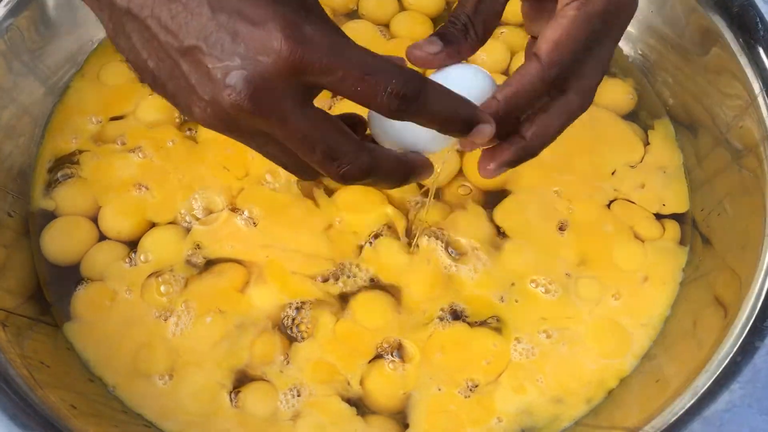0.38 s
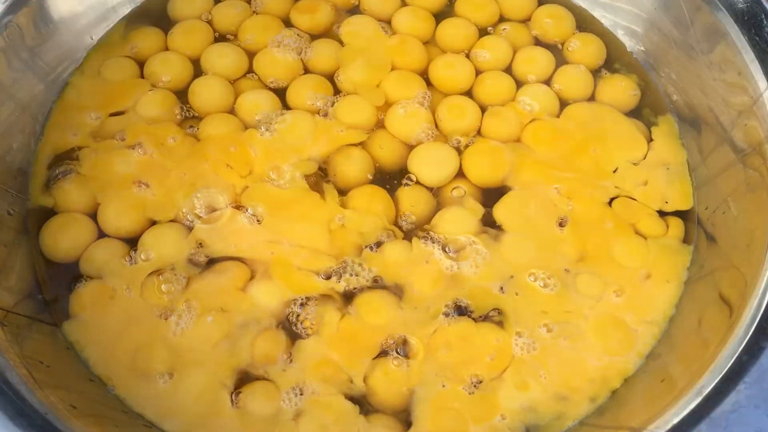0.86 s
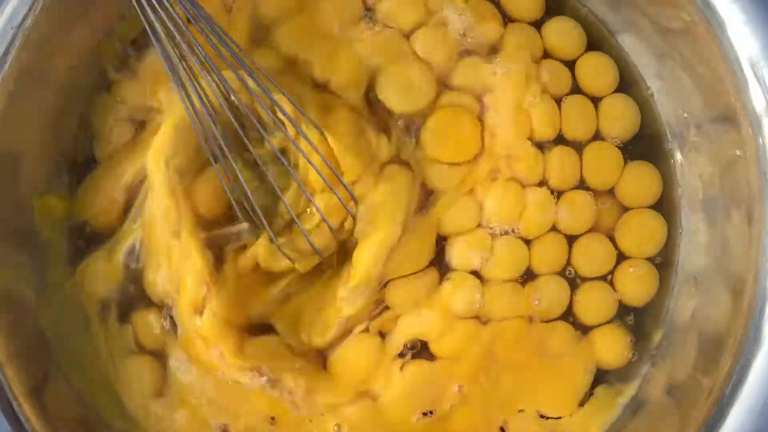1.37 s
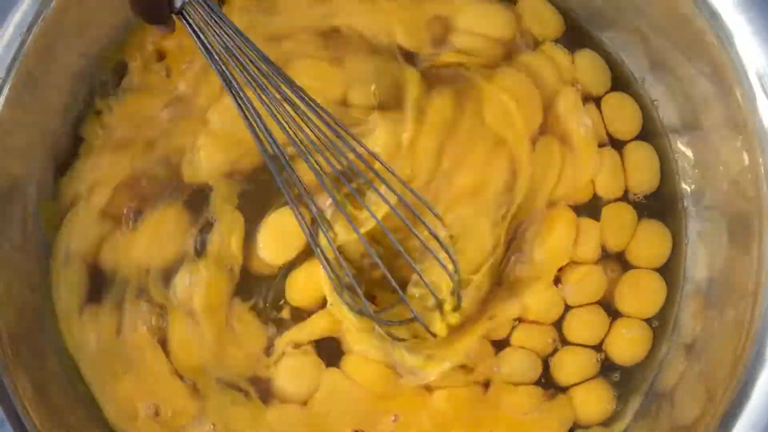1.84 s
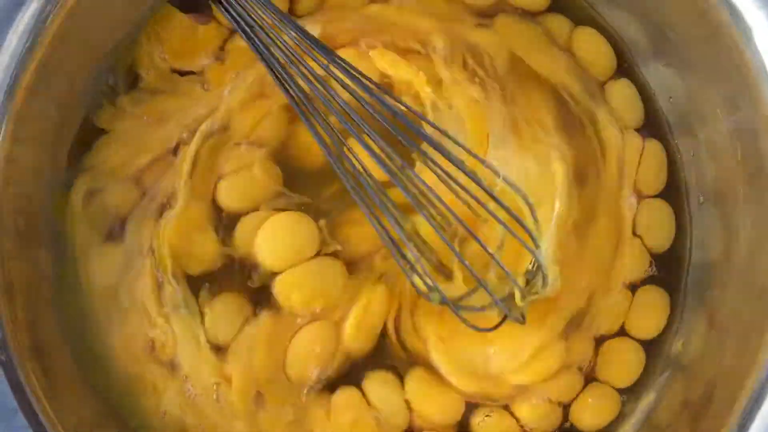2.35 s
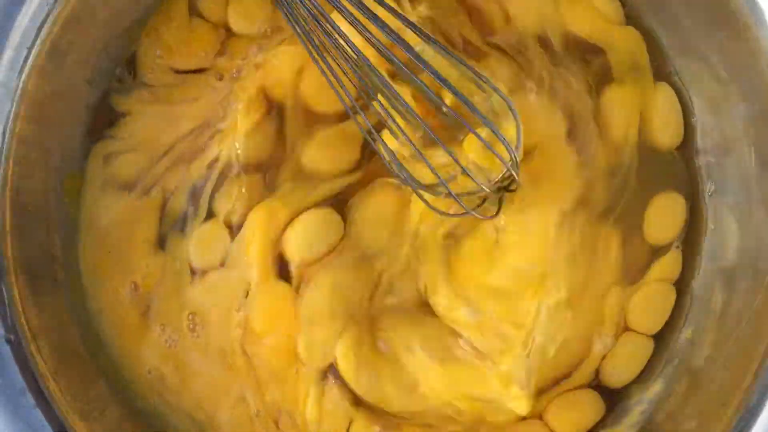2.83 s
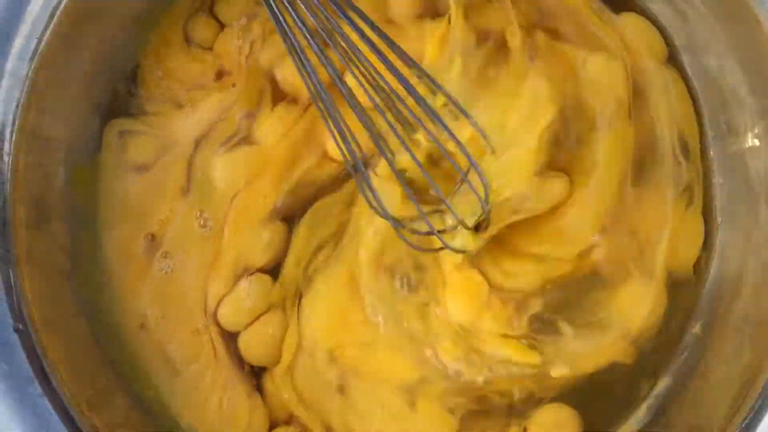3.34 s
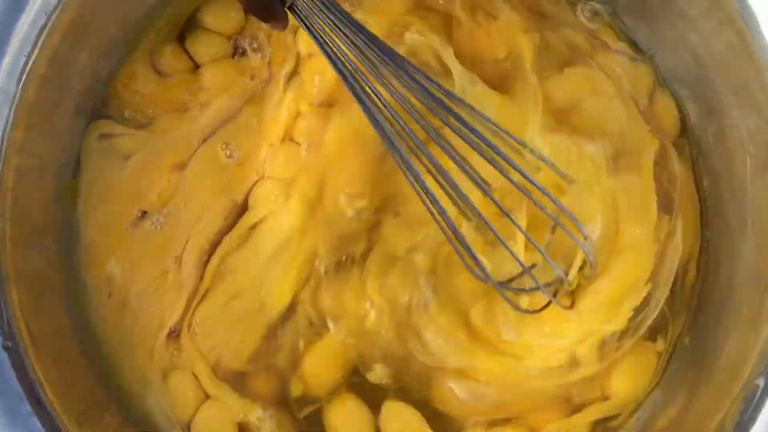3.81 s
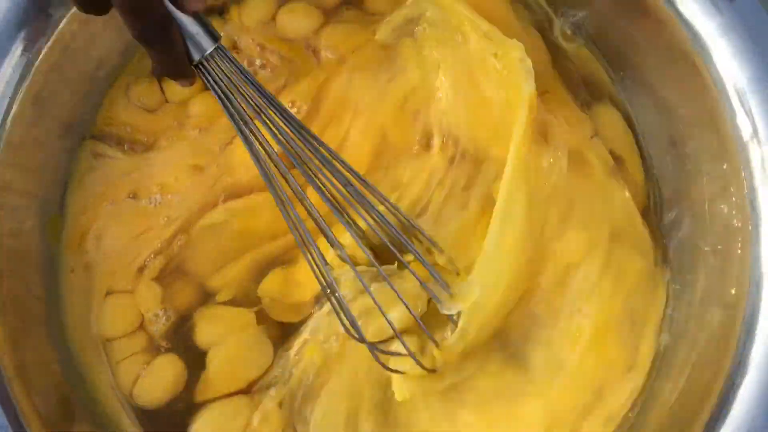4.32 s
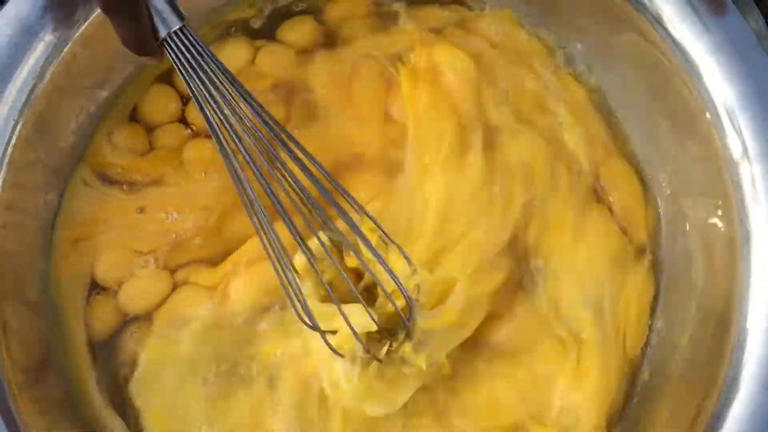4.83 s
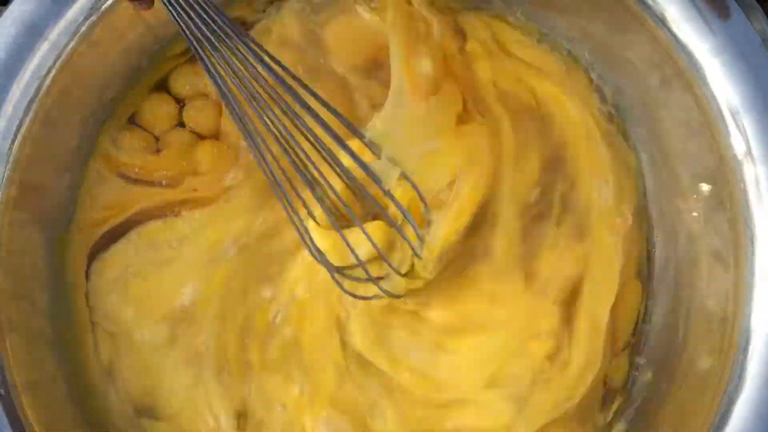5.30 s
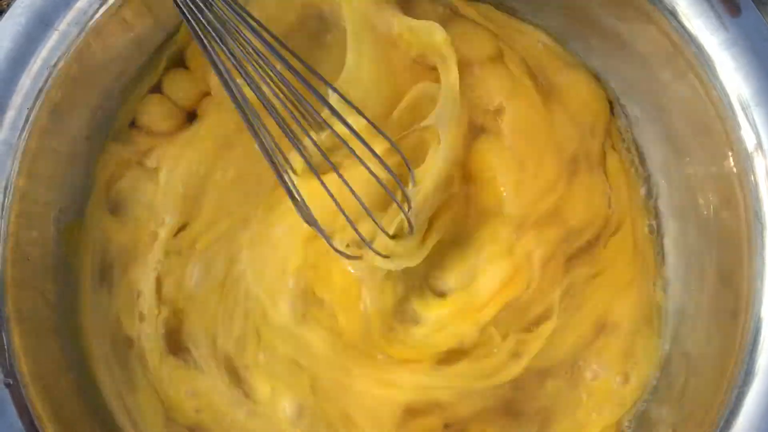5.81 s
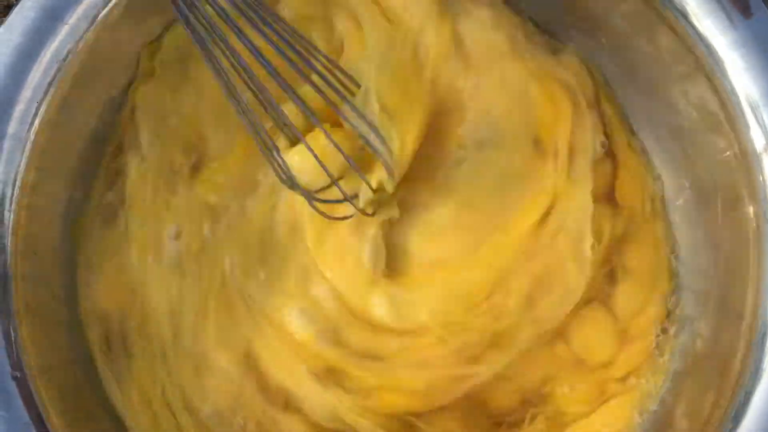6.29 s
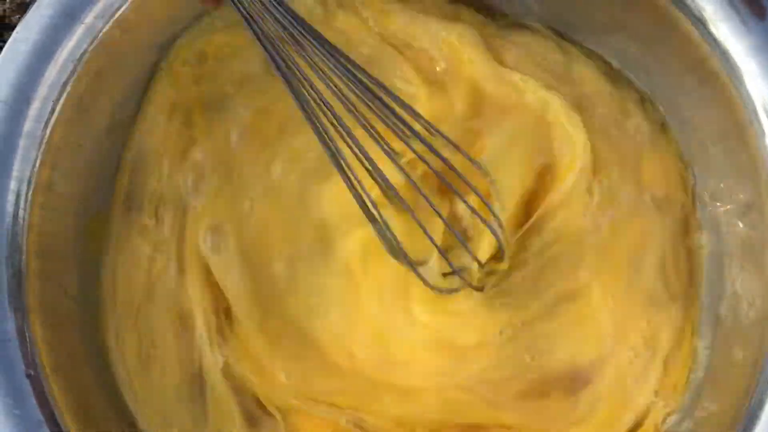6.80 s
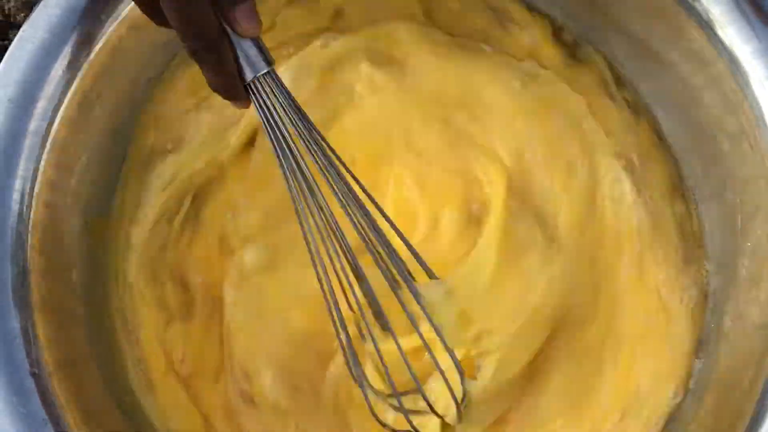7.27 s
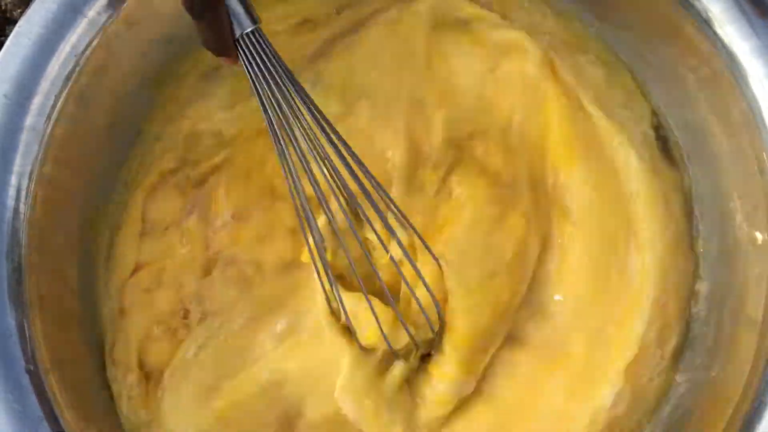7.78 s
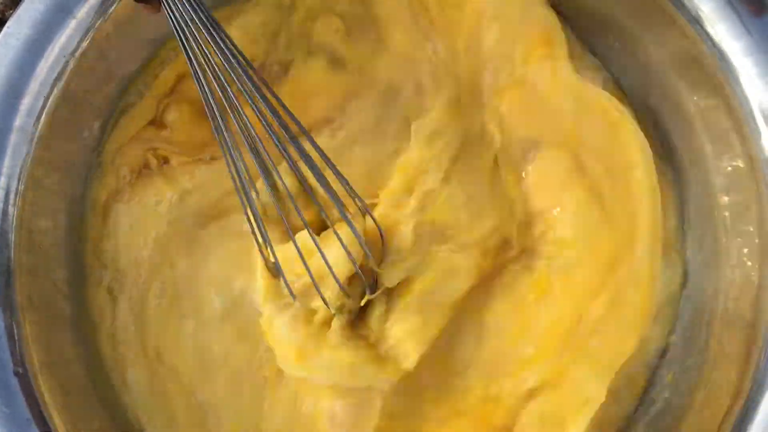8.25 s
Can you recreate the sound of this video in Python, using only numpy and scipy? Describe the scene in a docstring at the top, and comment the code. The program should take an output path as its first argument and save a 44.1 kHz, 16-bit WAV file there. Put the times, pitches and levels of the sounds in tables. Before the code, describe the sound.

A nearly quiet opening with small crisp eggshell ticks over light wind, then a sudden wet plop as the whisk enters. Hesitant first strokes grow into vigorous, steady beating: thick sloshes, rising bubble pops, fine splashes and short rattling wire hits on a heavy muffled steel bowl. The microphone is close, in open air with little echo, catching low gusts or bumps and a faint upward bird whistle.

```python
"""Whisking eggs outdoors

An egg shell is pulled apart over a large steel bowl of raw eggs; a wire whisk plunges in and, after a
short gap of silence, beats them about four times a second. Shell cracks and bubbles pop and gurgle as damped
sines of climbing pitch, wet films snap as ragged noise ticks, and wires strike the modes of the egg-damped
bowl. Low shaped noise makes wind and perhaps table bumps; a distant bird whistles upward as a gliding sine."""
import sys
import numpy as np
from scipy import signal
from scipy.fft import rfft, irfft, next_fast_len
from scipy.io import wavfile
from scipy.ndimage import uniform_filter1d, map_coordinates

SR = 44100
rng = np.random.default_rng(int(sys.argv[2]) if len(sys.argv) > 2 else 0)


def convert_level_to_amplitude(level_db):
    """Map a level in decibels to its linear amplitude factor."""
    exponent = np.asarray(level_db, float) / 20
    return 10 ** exponent


def digitize_waveform(pressure):
    """Quantize a signal to 16-bit integers and store it at the path in sys.argv[1].

    Rows of a 2-D input are taken as channels; values are limited to [-1, 1].
    """
    field = np.atleast_2d(pressure).T
    bounded = np.clip(field, -1, 1)
    quanta = np.round(bounded * 32767).astype(np.int16)
    wavfile.write(sys.argv[1], SR, quanta)


N = 381024  # samples: 8.64 s


def unit(x):
    """Scales x to rms 1."""
    return x / np.sqrt(np.mean(x ** 2) + 1e-20)


def rows_unit(x):
    """Scales every row to energy 1."""
    return x / np.linalg.norm(x, axis=1, keepdims=True)


def noise():
    """White noise for the whole scene."""
    return rng.standard_normal(N)


def along(points, hz):
    """Reads a curve of (f/Hz, value) points on a log frequency axis."""
    f, value = np.transpose(points)
    return np.interp(np.log(hz + 1), np.log(f + 1), value)


def curve(rows):
    """One value per sample, in straight lines between (t/s, value) rows."""
    return np.interp(np.arange(N) / SR, *np.transpose(rows))


def wobble(rate):
    """A smooth random curve with `rate` knots a second."""
    knots = rng.standard_normal(int(N * rate / SR) + 4)
    return map_coordinates(knots, [np.arange(N) * rate / SR])


def filtered(x, response):
    """x times a response of frequency."""
    m = next_fast_len(N + SR // 2)
    return irfft(rfft(x, m) * response(np.fft.rfftfreq(m, 1 / SR)), m)[..., :N]


def coloured(x, spectrum):
    """x through an EQ curve of (f/Hz, level/dB) points."""
    return filtered(x, lambda hz: convert_level_to_amplitude(along(spectrum, hz)))


def placed(times, grains):
    """Mixes rows of samples at their start times in seconds."""
    at = np.round(times * SR).astype(int)[:, None] + np.arange(grains.shape[1])
    return np.bincount(at.ravel(), grains.ravel(), N + SR)[:N]


def swells(s, db, rise_db_per_s, fall_db_per_s):
    """Summed power of humps that climb to a peak and die away, straight in dB."""
    step = np.arange(0, N, 64) / SR
    lag = step - s[:, None]
    hump_db = db[:, None] - np.where(lag < 0, -lag * rise_db_per_s, lag * fall_db_per_s)
    power = (convert_level_to_amplitude(hump_db) ** 2).sum(axis=0)
    return np.interp(np.arange(N) / SR, step, power)


def bubbles(s, db, hz, t60, rise, attack, rough, linger, size):
    """Damped sines whose pitch climbs, as when a pocket nears the surface, and wavers like its moving walls."""
    t = np.arange(size) / SR
    hz, t60 = hz[:, None], t60[:, None]
    walk = np.cumsum(rng.standard_normal((len(s), size)), axis=1)
    waver = uniform_filter1d(walk, size=24, axis=1) * np.sqrt(hz / SR)
    # rise: share of the pitch gained in one t60
    turns = hz * (t + rise * t * t / (2 * t60)) + rough * waver
    fade = (1 - linger) * convert_level_to_amplitude(-60 * t / t60) + linger * convert_level_to_amplitude(-24 * t / t60)  # a weak part sings on
    onset = 1 - np.exp(-t * hz / attack)  # attack in cycles
    shape = convert_level_to_amplitude(db[:, None]) * fade * onset * (1 - t / t[-1])
    return placed(s, shape * np.sin(2 * np.pi * turns))


# Slow wind: t/s, buffet level/dB before a small random wobble
BREEZE_LEVEL = [(0, -54.5), (.6, -61.5), (.8, -57), (1.5, -59.5), (1.9, -55.5), (2.3, -70), (2.42, -76),
                (2.6, -61), (3.4, -59.5), (3.9, -66), (4.7, -59), (5.2, -52.5), (5.55, -56), (5.75, -63),
                (6.3, -60.5), (6.7, -56.5), (7.1, -63), (8.63, -59.5)]
# Low swells: wind gusts, perhaps some table bumps: t/s, peak level/dB, time to fall 10 dB on each side/s
LOW_SWELLS = [(1.31, -48.5, .1), (2.199, -36.5, 0.12), (3.56, -50.5, 0.1), (3.78, -51.5, 0.07),
              (4.0, -39, 0.03), (4.25, -49.5, 0.1), (4.41, -42.5, 0.06), (4.81, -38, 0.05),
              (4.92, -32.5, 0.0628), (5.82, -45, .08), (6.89, -42.5, 0.04), (8.29, -45.5, 0.1),
              (8.49, -41, 0.02), (8.63, -44.5, .04)]
# Colour of the low rumble: f/Hz, relative level/dB per Hz
BUFFET_COLOUR = [(12, -50), (20, -20.5), (49, 9.5), (83, 2.5), (175, -18), (400, -41), (520, -64),
                 (880, -120)]
# Colour of the flapping in strong swells: f/Hz, relative level/dB per Hz
FLAP_COLOUR = [(40, -120), (70, -31), (110, 4.5), (200, -10.5), (400, -34), (800, -120)]
# Colour of the outdoor hush: f/Hz, relative level/dB per Hz
HUSH_COLOUR = [(100, -8.5), (160, -5), (300, -12.5), (600, -19), (1200, -21), (3000, -30.5), (8000, -38),
               (16000, -42.5)]


def outdoors():
    """Lumpy low noise of wind on the microphone and perhaps table bumps, higher as it swells, over a hush."""
    s, db, width = np.transpose(LOW_SWELLS)
    slope = 10 / width[:, None]  # dB per s
    breeze = convert_level_to_amplitude(curve(BREEZE_LEVEL) + 1.5 * wobble(7.7)) ** 2
    force_db = 10 * np.log10(swells(s, db, slope, slope) + breeze)
    buffet = unit(coloured(noise(), BUFFET_COLOUR) * convert_level_to_amplitude(0.9 * wobble(9.8)))
    flap = unit(coloured(noise(), FLAP_COLOUR) * convert_level_to_amplitude(5 * wobble(20)))
    hush = unit(coloured(noise(), HUSH_COLOUR)) * convert_level_to_amplitude(0.98 * wobble(3.7))
    flap_db = 1.413 * force_db + 5.5  # grows faster than the buffet
    return convert_level_to_amplitude(force_db) * buffet + convert_level_to_amplitude(flap_db) * flap + convert_level_to_amplitude(-66) * hush


# Bird whistles: t/s, level/dB before a quick random wobble
WHISTLES = [(2.798, -74), (2.988, -68), (3.188, -66), (3.388, -66)]


def bird():
    """A repeated whistle: a slightly unsteady sine that rises, more slowly towards its top."""
    t = np.arange(int(.085 * SR)) / SR
    hz = 2300 + 2700 * (1 - np.exp(-t / 0.11))
    swell = np.sin(np.pi * t / t[-1]) ** 0.51
    call = swell * np.sin(2 * np.pi * np.cumsum(hz) / SR)
    s, db = np.transpose(WHISTLES)
    return placed(s, convert_level_to_amplitude(db[:, None]) * call) * convert_level_to_amplitude(1.7 * wobble(90))


def hollow(x, size=4096):
    """The bowl's open hollow answers with a short dull tail that varies at random from moment to moment."""
    t = np.arange(size) / SR
    starts = np.arange(0, N, size // 2)
    padded = np.pad(x, (size // 2, size))
    pieces = padded[starts[:, None] + np.arange(size)] * np.hanning(size)
    dull = signal.lfilter([.3], [1, -.7], rng.standard_normal(pieces.shape))
    # a fresh tail for each piece avoids steady stripes in the spectrum
    tails = rows_unit(dull * convert_level_to_amplitude(-60 * t / 0.041) * (t > .001))
    answer = signal.fftconvolve(pieces, tails, axes=1)
    at = starts[:, None] + np.arange(answer.shape[1])
    return np.bincount(at.ravel(), answer.ravel())[size // 2:][:N]


# Whisk passes through the egg: t/s of the fullest slosh, gurgle level/dB
WHISK_PASSES = [(1.24, -61), (1.73, -63.5), (2.06, -61.5), (2.27, -66), (2.48, -54), (2.66, -60),
                (2.932, -47), (3.14, -52), (3.37, -49), (3.589, -44), (3.8, -41), (4.04, -45.5),
                (4.23, -42), (4.46, -39.5), (4.67, -47.5), (4.888, -41), (5.129, -40.5), (5.358, -43),
                (5.608, -43.5), (5.81, -45.5), (6.08, -46.5), (6.27, -50), (6.608, -49), (6.81, -46),
                (7.03, -46.5), (7.31, -44), (7.55, -45), (7.73, -48.5), (8.01, -48.5), (8.248, -42.5),
                (8.49, -45.5)]
# Egg circling on between passes: t/s, gurgle level/dB
SWIRL_LEVEL = [(1.17, -65), (1.46, -68.5), (1.6, -76), (2.1, -67.5), (2.9, -70), (3.5, -60), (4.7, -53),
               (5.6, -55.5), (6.4, -51.5), (6.9, -62), (8.63, -52.5)]
# Egg white running from the shell: t/s, gurgle level/dB
DRIBBLE_LEVEL = [(.1, -90), (.2, -77), (.6, -79), (.8, -90)]


def stirring():
    """Every pass heaps the egg up and lets it settle over a slow swirl; before the whisk the shell dribbles."""
    passes = swells(*np.transpose(WHISK_PASSES), rise_db_per_s=138, fall_db_per_s=166)
    stirred = np.sqrt(passes + convert_level_to_amplitude(curve(SWIRL_LEVEL)) ** 2)
    whisk_in = np.arange(N) / SR > SWIRL_LEVEL[0][0]
    return np.where(whisk_in, stirred, convert_level_to_amplitude(curve(DRIBBLE_LEVEL)))


# Bubble strength by pitch, also the colour of the wet rush: f/Hz, relative level/dB
FROTH_COLOUR = [(200, -38), (350, -36), (600, -4.5), (1200, 3), (2200, 2.5), (4000, -16), (7000, -29),
                (12000, -72)]


def gurgle(count=5500):
    """A tangle of small pockets and a lumpy wet rush, both following the stirring."""
    u = rng.random((count, 4))
    hz = 450 * 2 ** (3.174 * u[:, 1] ** 1.104)
    db = along(FROTH_COLOUR, hz) - 3 * np.log(u[:, 2] + 0.0069)  # most are faint, a few stand out
    t60 = (7 + 20 * u[:, 3]) / hz
    froth = bubbles(u[:, 0] * N / SR, db, hz, t60, rise=0.7 * u[:, 3:] ** 2, attack=1.0,
                    rough=0.086, linger=0, size=SR // 50)
    rush = unit(coloured(noise(), FROTH_COLOUR))
    return stirring() * unit(convert_level_to_amplitude(4.43 * wobble(35)) * (unit(froth) + 0.1 * rush))


# Colour of snapping film and fine splash: f/Hz, relative level/dB
FILM_COLOUR = [(300, -22), (1000, 5), (3000, 9), (5000, 0.5), (9000, -7.5), (10500, -14.5), (13000, -12),
               (16000, -38)]


def droplets(count=3200):
    """Fine splash: tiny high pockets of a few cycles and short bursts of fizz, in clumps."""
    u = rng.random((count, 4))
    hz = 2500 * 2 ** (2.45 * u[:, 1])
    db = along(FILM_COLOUR, hz) - 5.1 * np.log(u[:, 2] + 0.0076)
    t60 = (5 + 22 * u[:, 3]) / hz
    fine = bubbles(u[:, 0] * N / SR, db, hz, t60, rise=0.32, attack=0.37,
                   rough=0.076, linger=0, size=SR // 100)
    fizz = unit(coloured(noise(), FILM_COLOUR) * convert_level_to_amplitude(10.0 * wobble(110)))
    clumps = unit((unit(fine) + 0.55 * fizz) * convert_level_to_amplitude(6.0 * wobble(30)))
    return convert_level_to_amplitude(-10.0) * stirring() * clumps


def gloops(count=330):
    """Middling pockets, scattered through the stirring: slow to start, long-lived, gliding upward."""
    u = rng.random((count, 5))
    hz = 520 * 2 ** (2.3 * u[:, 1])
    stir_db = 20 * np.log10(stirring()[(u[:, 0] * N).astype(int)] + 1e-9)
    db = -4 - 4 * np.log(u[:, 2] + .05) + stir_db
    t60 = 43 * (.3 + 0.73 * u[:, 3]) / hz  # 13 to 44 cycles
    return bubbles(u[:, 0] * N / SR, db, hz, t60, rise=0.91 * u[:, 4:] ** 2, attack=1.5,
                   rough=0.071, linger=.2, size=SR // 12)


# Short tonal pops: shell cracks, then bubbles in the egg:
# t/s, level/dB, starting f/Hz, t60/s of the main part
TONAL_POPS = [(0.165, -58, 3050, 0.011), (0.185, -58, 3000, 0.02), (0.217, -43.5, 620, 0.017),
              (0.221, -48.5, 2141, 0.022), (0.236, -45, 2060, 0.014), (0.324, -47.5, 598, 0.012),
              (0.325, -46.5, 1440, 0.015), (0.338, -56, 1030, 0.11), (0.487, -34.5, 1390, 0.027),
              (0.547, -55, 2130, 0.037), (0.548, -57, 3000, 0.014), (0.617, -58, 3000, 0.011),
              (0.665, -49, 1555, 0.0094), (0.75, -54, 1430, 0.016), (1.176, -32.0, 1359, 0.045),
              (1.183, -37, 384, 0.025), (1.196, -13.5, 1800, 0.0069), (1.206, -32.5, 385, 0.04),
              (1.234, -39.5, 1363, 0.012), (1.261, -38.5, 2285, 0.011), (1.264, -42, 359, 0.117),
              (1.28, -30.5, 1478, 0.014), (1.356, -42, 2000, 0.012), (1.388, -36.5, 1690, 0.011),
              (1.446, -29.5, 1584, 0.0053), (1.91, -43.5, 3580, 0.01), (2.015, -32.5, 916, 0.014),
              (2.086, -45, 2200, 0.01), (2.19, -48.5, 5700, 0.01), (2.22, -43, 2040, 0.017),
              (2.248, -38.5, 1296, 0.012), (2.378, -39.5, 4512, 0.012), (2.418, -41.5, 2640, 0.012),
              (2.438, -40, 1747, 0.014), (2.495, -37, 2458, 0.026), (2.662, -42.5, 822, 0.047),
              (2.747, -44, 1750, 0.026), (2.793, -41, 2851, 0.014), (2.876, -16.5, 2204, 0.023),
              (2.887, -28.5, 624, 0.015), (2.89, -28.5, 1258, 0.026), (2.904, -22.5, 415, 0.042),
              (2.923, -21.0, 474, 0.052), (2.947, -35, 701, 0.15), (3.103, -20, 2140, 0.0089),
              (3.105, -38, 886, 0.044), (3.144, -30.5, 2040, 0.021), (3.292, -35.5, 1590, 0.024),
              (3.329, -18.0, 1930, 0.013), (3.365, -33.5, 502, 0.084), (3.517, -39.5, 944, 0.05),
              (3.554, -35.5, 1707, 0.12), (3.574, -31.5, 570, 0.035), (3.659, -32, 1600, 0.019),
              (3.78, -32.5, 950, 0.023), (3.784, -35.0, 1564, 0.13), (3.805, -30, 490, 0.067),
              (3.838, -21.0, 586, 0.013), (3.975, -32, 960, 0.065), (4.011, -28.5, 1690, 0.016),
              (4.02, -28.5, 570, 0.011), (4.182, -31, 1234, 0.061), (4.183, -20.5, 610, 0.024),
              (4.202, -25.5, 2064, 0.0098), (4.238, -21.5, 635, 0.014), (4.401, -22.5, 1300, 0.015),
              (4.422, -22, 1110, 0.022), (4.426, -24.5, 658, 0.016), (4.437, -38, 743, 0.21),
              (4.439, -26.0, 1330, 0.032), (4.468, -26.5, 695, 0.041), (4.601, -28.5, 758, 0.029),
              (4.639, -28.5, 1870, 0.02), (4.771, -29.5, 730, 0.017), (4.854, -32.5, 664, 0.058),
              (4.897, -23, 640, 0.01), (4.9, -25.5, 2563, 0.0069), (5.088, -23.0, 1620, 0.045),
              (5.118, -12.0, 1250, 0.0053), (5.217, -28, 2770, 0.012), (5.308, -28, 1603, 0.014),
              (5.311, -28, 1030, 0.02), (5.341, -30, 774, 0.027), (5.344, -27.5, 1594, 0.015),
              (5.475, -32.5, 1594, 0.015), (5.571, -32.5, 681, 0.061), (5.571, -25.5, 1632, 0.012),
              (5.711, -34, 2135, 0.04), (5.746, -26.5, 1530, 0.015), (5.762, -32.5, 950, 0.047),
              (5.789, -27.5, 1884, 0.027), (5.804, -33, 850, 0.027), (5.908, -30, 1930, 0.011),
              (5.968, -20, 1860, 0.0049), (6.041, -36, 586, 0.04), (6.075, -27, 654, 0.053),
              (6.185, -33.5, 598, 0.081), (6.266, -25, 806, 0.013), (6.45, -34.5, 2910, 0.014),
              (6.47, -30.5, 2600, 0.0075), (6.537, -28, 697, 0.041), (6.762, -22, 690, 0.0073),
              (6.783, -34, 732, 0.055), (7.021, -23, 856, 0.027), (7.116, -25.5, 1560, 0.011),
              (7.116, -33, 930, 0.044), (7.262, -23, 586, 0.091), (7.301, -31, 722, 0.082),
              (7.486, -17.5, 842, 0.055), (7.486, -10.5, 1440, 0.0067), (7.692, -34.0, 760, 0.066),
              (7.729, -18, 3670, 0.0054), (7.747, -18.0, 1980, 0.011), (7.879, -35.5, 857, 0.032),
              (7.961, -32.5, 3170, 0.03), (7.966, -30.5, 920, 0.024), (8.15, -34.5, 547, 0.069),
              (8.187, -23.5, 902, 0.033), (8.243, -31.5, 775, 0.064), (8.269, -28, 558, 0.03),
              (8.386, -23, 1130, 0.0088), (8.446, -29, 1050, 0.014), (8.473, -18.5, 1620, 0.0071),
              (8.538, -29, 1550, 0.012), (8.57, -30.0, 900, 0.017), (8.623, -33.5, 515, 0.059)]


def pops():
    """The listed pops, one by one, each a damped sine of climbing pitch."""
    return bubbles(*np.transpose(TONAL_POPS), rise=0.252, attack=0.4,
                   rough=0.084, linger=0.18, size=SR // 8)


# Loudest cracks of shell and tears of wet film: t/s, energy level/dB before the film colour
LOUD_TEARS = [(0.2166, -34.5), (0.3231, -36.0), (0.486, -34), (0.546, -41), (0.5543, -37), (0.6647, -35.5),
              (0.683, -47), (0.7503, -43.0), (1.1727, -17), (1.1955, -23), (1.213, -26.5), (1.2794, -31.5),
              (1.3153, -26), (1.388, -36), (1.6933, -28), (1.7174, -30), (1.908, -37), (1.995, -36.5),
              (2.0133, -32.5), (2.042, -36.5), (2.0777, -28), (2.1196, -37), (2.189, -38), (2.219, -33.5),
              (2.308, -36.5), (2.378, -23), (2.385, -30.5), (2.4154, -28.5), (2.4522, -19), (2.6598, -26.5),
              (2.7133, -28.5), (2.7918, -23.5), (2.8781, -11.5), (2.8945, -14), (2.9233, -16.5),
              (3.092, -27), (3.111, -25), (3.1394, -19), (3.3294, -13), (3.3501, -20), (3.378, -26.5),
              (3.5532, -19), (3.5856, -10.5), (3.7664, -18.5), (3.7749, -24), (3.8332, -11), (4.0096, -20),
              (4.0474, -20.5), (4.1823, -20), (4.223, -22), (4.2354, -15.5), (4.401, -20.5),
              (4.4177, -13.5), (4.439, -18.5), (4.4661, -21), (4.5898, -19.5), (4.638, -13.5),
              (4.6732, -21.5), (4.892, -18.5), (4.926, -21), (5.0885, -13.5), (5.1118, -19), (5.217, -26),
              (5.3095, -15.5), (5.339, -20.5), (5.5287, -24), (5.576, -21.0), (5.601, -20), (5.748, -16.5),
              (5.8246, -21.5), (6.0748, -17), (6.218, -25.5), (6.265, -24.5), (6.4077, -22.5),
              (6.5175, -24), (6.5985, -14.5), (6.7908, -14.0), (7.0186, -17.5), (7.0544, -14.5),
              (7.0724, -16), (7.1145, -24.0), (7.299, -21), (7.3055, -17), (7.4848, -7.5), (7.536, -18),
              (7.5486, -24), (7.7291, -15), (7.7463, -19.5), (7.9243, -18.5), (7.9614, -18.5),
              (7.9968, -20), (8.1894, -20), (8.2388, -25), (8.4096, -20.5), (8.4917, -22.5)]


def snaps(count=600):
    """Short ragged noise ticks: the loud ones, and many small, thin, pitched ones that follow the stirring."""
    t = np.arange(SR // 50) / SR
    s, db = np.transpose(LOUD_TEARS)
    loud = len(db)
    u = rng.random((count, 4))
    effort = unit(stirring())[(u[:, 0] * N).astype(int)] ** 0.84  # share of the stirring's swing in dB
    small = convert_level_to_amplitude(-45.5 - 6 * np.log(u[:, 1] + 0.041)) * effort
    s = np.append(s, u[:, 0] * N / SR)
    gain = np.append(convert_level_to_amplitude(db), small)
    life = np.append(np.full(loud, .014), 0.0032 + 0.0085 * u[:, 2])[:, None]  # s
    life = life * convert_level_to_amplitude(rng.normal(0, 2.2, (len(s), 1)))
    jerks = rng.standard_normal((len(s), len(t) // 21))
    ragged = convert_level_to_amplitude(0.69 * np.repeat(jerks, 21, axis=1))  # a tear goes in jerks
    envelope = convert_level_to_amplitude(-60 * t / life) * (1 - np.exp(-t / 0.00022))
    tear = envelope * ragged * rng.standard_normal(ragged.shape)
    # each small tear keeps a narrow band around its own pitch
    pitch = 3500 * 2 ** (2.1 * u[:, 3:])
    octaves = np.log2((np.fft.rfftfreq(2 * len(t), 1 / SR) + 1) / pitch)
    thin = irfft(rfft(tear[loud:], 2 * len(t)) * convert_level_to_amplitude(-14 * np.abs(octaves)))[:, :len(t)]
    ticks = gain[:, None] * rows_unit(np.vstack([tear[:loud], thin]))
    return coloured(placed(s, ticks), FILM_COLOUR)


# Egg-damped modes of the steel bowl: f/Hz, width/Hz, relative level/dB (f and level vary per blow)
BOWL_MODES = [(216, 49, -10), (330, 133, 18.5), (415, 53, 18), (686, 110, 2), (1058, 36.5, 14.5),
              (1280, 320, 0), (1516, 210, 5.5), (1750, 110, 4.5), (1862, 110, 8.5), (2202, 164, 8.5),
              (2587, 150, 1.5), (2550, 40, 11), (2797, 200, 5), (3030, 300, -2.5), (3335, 200, 6),
              (3734, 170, 4.5), (4170, 280, -33), (6050, 770, -24.5)]


def bowl(blows, low, scatter_db, detune):
    """Each row of blows drives the bowl's low or high modes; contact point and egg load vary by blow."""
    m = next_fast_len(3 * blows.shape[1])
    f = np.fft.rfftfreq(m, 1 / SR)
    chance = rng.standard_normal((len(blows), len(BOWL_MODES), 2, 1))
    response = 0
    for k, (hz, width, db) in enumerate(BOWL_MODES):
        if (hz < 500) == low:
            centre = hz * (1 + detune * chance[:, k, 0])
            gain = (-1) ** k * convert_level_to_amplitude(db + scatter_db * chance[:, k, 1])
            damping = 1j * f * width
            response = response + gain * damping / (centre ** 2 - f * f + damping)
    return irfft(rfft(blows, m) * response, m)


# Wires on the bowl: t/s, clank energy level/dB, thud energy level/dB
WIRE_STRIKES = [(1.1776, -19.5, -18), (1.6447, -32.5, -37), (1.6923, -11.5, -24), (2.4513, -5.5, -15.0),
                (2.605, -26.5, -22.5), (2.9309, -4, -14.5), (3.1393, -21, -50.0), (3.5837, -24, -28),
                (3.8275, 2.5, -10.5), (4.0462, -6.5, -14.5), (4.2373, -6, -13), (4.4654, -5.5, -14),
                (4.6983, -16, -19.5), (4.9267, -11, -19.5), (5.1609, -15, -21.5), (5.3813, -7.5, -13.5),
                (5.6006, -3.5, -10.0), (6.0701, -4, -9.5), (6.3286, -12, -16), (6.5922, -9.0, -13.5),
                (6.7598, -8, -11.5), (7.057, 0.5, -8.5), (7.2997, -3.5, -13.5), (7.5372, -6, -13),
                (7.9956, -5, -13.5), (8.2374, -9, -17), (8.4935, -16, -17.5)]


def strikes():
    """The wires land in a ragged volley and drag along the steel; the bowl's floor gives a slower thud."""
    t = np.arange(SR // 5) / SR
    s, clank_db, thud_db = np.transpose(WIRE_STRIKES)
    shape = (len(s), len(t))
    spikes = rng.standard_normal(shape) * convert_level_to_amplitude(4 * rng.standard_normal(shape))
    drag = np.exp(-(t / 0.018) ** 2)  # wire after wire keeps the contact going, then the whisk lifts
    # wires rattle on after the drag, 3.5 dB weaker each second as egg coats them
    rattle = convert_level_to_amplitude(-0.5 - 3.5 * s[:, None] - 60 * t / 0.23)
    landing = rows_unit(convert_level_to_amplitude(-60 * t / 0.0039) * spikes)
    volley = 0.67 * landing + rows_unit((drag + rattle) * spikes)
    push = convert_level_to_amplitude(-60 * t / .11) * (1 - np.exp(-t / 0.0024)) * rng.standard_normal(shape)
    clank = rows_unit(bowl(volley, False, scatter_db=-1.5, detune=0.0067))
    thud = rows_unit(bowl(push, True, scatter_db=3.5, detune=0.01))
    return placed(s, convert_level_to_amplitude(clank_db[:, None]) * clank + convert_level_to_amplitude(thud_db[:, None]) * thud)


def scene():
    """Egg and whisk in the bowl with its hollow answer, open air around."""
    egg = gurgle() + droplets() + gloops() + pops() + snaps() + strikes()
    return (outdoors() + bird() + convert_level_to_amplitude(-8.5) * hollow(egg) + egg)[None]


def band_limit(x):
    """A steep low-pass at the top of the band."""
    return signal.sosfilt(signal.butter(12, 16490, fs=SR, output="sos"), x)


# Short gap of silence: start t/s, end t/s
SILENCE = (1.4685, 1.493)


def record(dry):
    """The whole sound drops out for a moment."""
    t = np.arange(N) / SR
    sounding = (t < SILENCE[0]) | (t > SILENCE[1])
    return band_limit(dry * sounding)


dry = scene()
out = record(dry)
digitize_waveform(out)
```